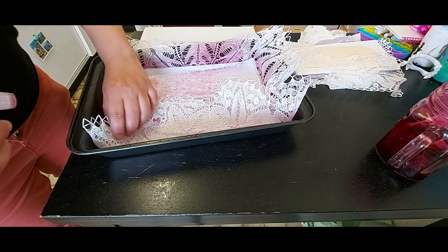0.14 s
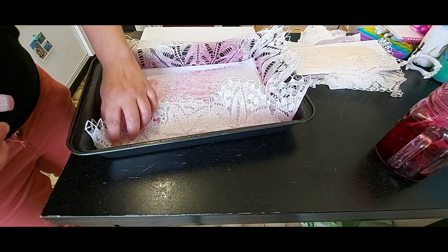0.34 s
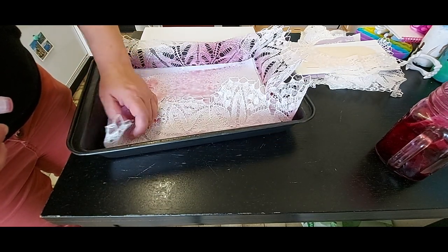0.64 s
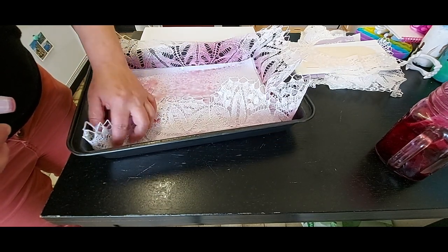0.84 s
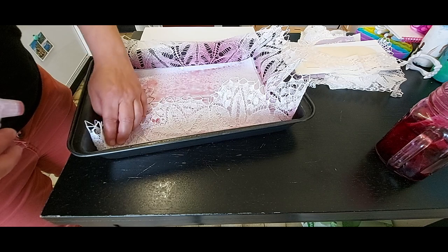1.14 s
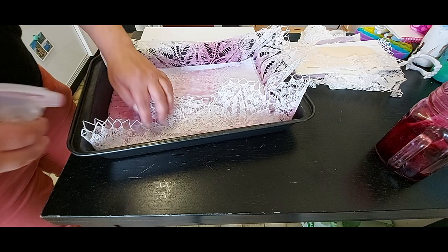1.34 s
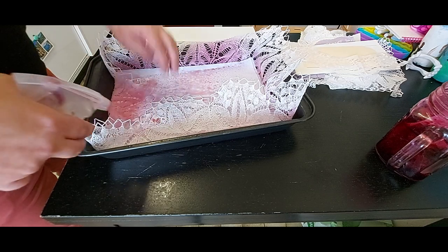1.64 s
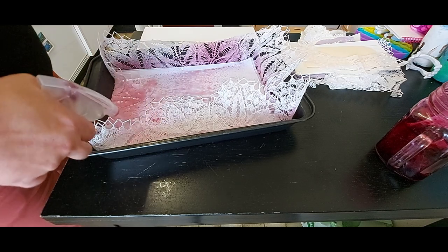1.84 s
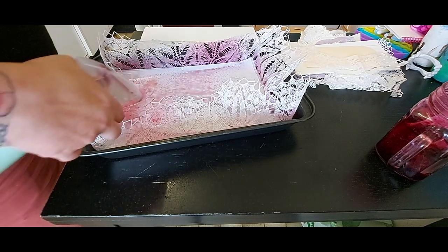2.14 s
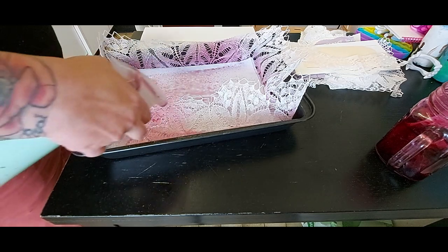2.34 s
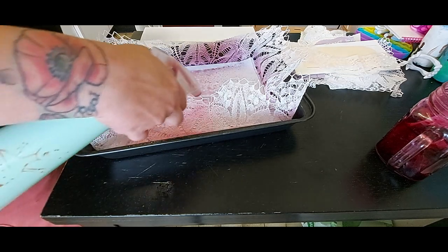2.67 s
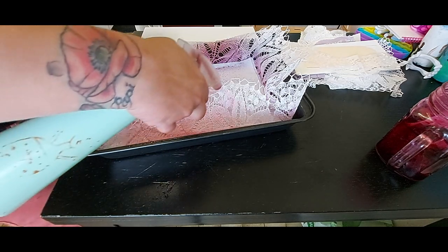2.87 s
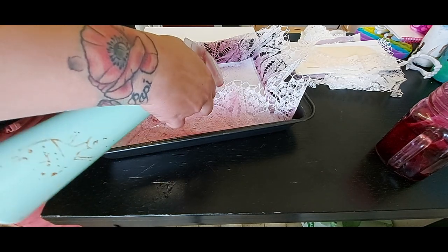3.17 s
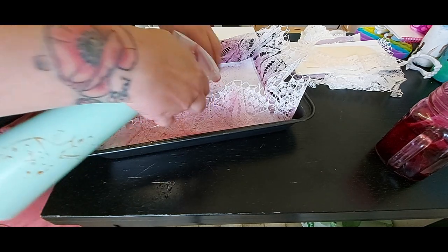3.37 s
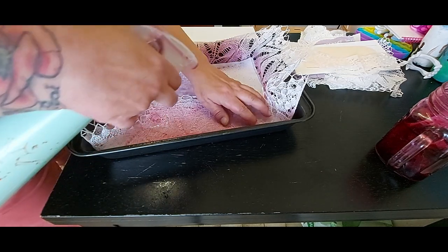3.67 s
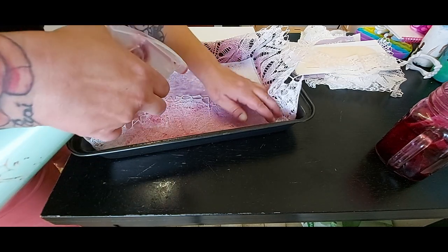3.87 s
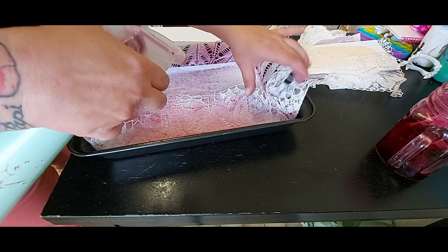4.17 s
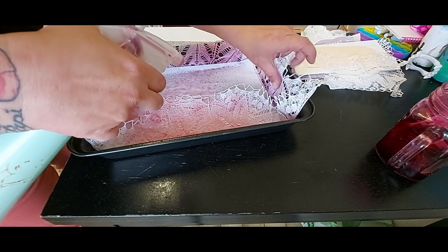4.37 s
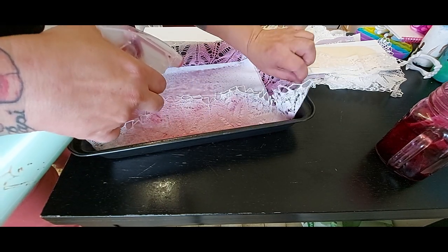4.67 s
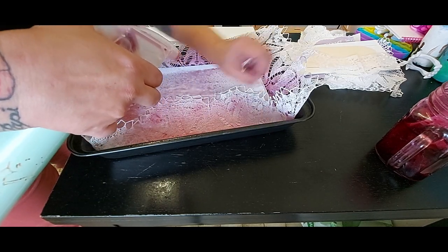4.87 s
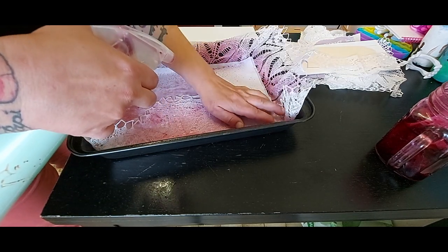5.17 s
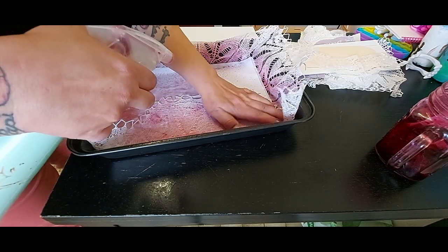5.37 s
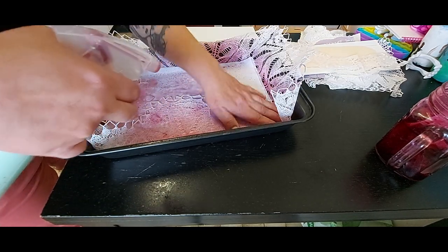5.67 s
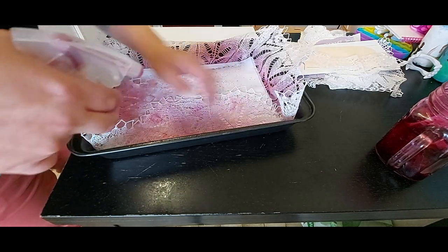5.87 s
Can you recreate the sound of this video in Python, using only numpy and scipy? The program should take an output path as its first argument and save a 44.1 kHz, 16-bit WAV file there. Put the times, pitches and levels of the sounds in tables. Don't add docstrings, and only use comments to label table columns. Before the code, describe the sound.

A close, quiet stereo scene in a small room with faint boomy air, a low motor hum and a thin flickering whine. From 0 to 1.3 s fingers brush paper softly, with a dry tick and plastic knock at 0.35 and a fainter one at 0.9. Around 1.45 plastic knocks cluster and the table thuds. At 1.75 the trigger lever clicks and the hollow bottle booms lightly; four spray bursts follow, peaking near 1.9, 2.25, 2.6 and 2.95, each swelling into bright wet hiss with droplets pattering and spitting on paper. Lever clicks punctuate them, sharpest at 2.6, with the release at 3.2. A barely audible air intake follows, with faint rustles and table bumps around 3.6. A soft, dull pat on the metal tray lands at 3.8, then near quiet. Three gentle pats come at 5.1, 5.3 and 5.5, with slight knocks and rustling to the end.

```python
import sys
import numpy as np
from scipy import signal
from scipy.fft import rfft, irfft, next_fast_len
from scipy.io import wavfile
from scipy.ndimage import uniform_filter1d, map_coordinates

SR = 44100
rng = np.random.default_rng(int(sys.argv[2]) if len(sys.argv) > 2 else 0)


def master(y):
    cut = np.clip(np.atleast_2d(y).T, -1, 1)
    pcm = np.round(cut * 32767)
    wavfile.write(sys.argv[1], SR, pcm.astype(np.int16))


def decibels_to_gain(level_db):
    exponent = np.asarray(level_db, float) / 20
    return 10 ** exponent


N = 265372
MS = np.arange(0, N / SR + 0.002, 0.001)

# hz, likeness
MIST_LIKENESS = [(60, 0.65), (240, 0.43), (950, 0.24), (3770, 0.02), (15000, 0.05)]
# hz, left_minus_right_db
MIST_LEAN = [(60, -8), (180, 9.5), (550, 1), (1650, -2), (4970, 1), (9500, -4.5), (15000, -1)]
# delay_s, level_db, left_minus_right_db
WALL_ECHOES = [(.0045, -19.5, 0), (0.012, -6, 0), (.018, -9.5, 0), (.024, -13.5, 0), (.033, -20.5, -1)]


def spray():
    # start_s, level_db
    leaks = [
        (1.735, -61),
        (1.787, -62),
        (2.114, -59),
        (2.463, -55.5),
        (2.819, -54.5),
        (3.199, -59.5),
    ]
    # hz, density_db
    nozzle = [(2060, -26), (3500, -20), (4100, -20), (5000, -7.5), (6870, -6), (9140, -2), (11000, -2),
              (12100, 0), (16000, -9)]
    # hz, density_db
    drops = [(210, -44.5), (350, -17.5), (771, -7.5), (852, -8), (1030, -5), (1110, -6), (1640, -2.5),
             (3020, -1.5), (4130, -1.5), (5120, -6), (7000, -5.5), (9100, -30.5), (15400, -120)]
    fall_s, hiss_over_drops_db = 0.11, -5
    dribbles = [(s, fall_s, db + hiss_over_drops_db, db) for s, db in leaks]
    hiss, patter = pressure() + flicks(dribbles, rise_s=0.002)
    jet = rush(nozzle, MIST_LIKENESS, patchy_db=2.0, grains=440, spread_db=2.0, side=MIST_LEAN)
    rain = rush(drops, MIST_LIKENESS, patchy_db=1.5, grains=570, spread_db=-3.5, side=MIST_LEAN)
    sputter_db = 0.33 * wobble(60)
    return decibels_to_gain(2 + sputter_db) * hiss * jet + decibels_to_gain(2.5 + sputter_db) * patter * rain


def pressure():
    # peak_s, hiss_db, drops_over_hiss_db
    strokes = [
        (1.894, -28.5, -3.5),
        (2.242, -31.5, -0.2),
        (2.593, -30, -.3),
        (2.964, -31.5, -.5),
    ]
    build_s, hold_s = 0.2, 0.016
    narrow_db = 80.5 * np.array([[1.033], [1]])
    level = 0
    for peak_s, hiss_db, drops_db in strokes:
        after_s = MS - peak_s
        after_s = after_s - np.clip(after_s, 0, hold_s)
        log_time = np.log(np.clip(1 + after_s / build_s, 1e-3, None))
        peak_db = np.array([[hiss_db], [hiss_db + drops_db]])
        level = level + decibels_to_gain(peak_db - narrow_db * log_time ** 2)
    return fine(level)


def sweeps():
    # middle_s, half_length_s, low_db, middle_db, high_db
    passes = [(1.845, 0.049, -55, -47, -50.5), (1.927, .05, -50.5, -43.5, -40),
              (1.998, 0.068, -49.5, -49, -50), (2.201, 0.047, -49.5, -40.5, -55),
              (2.269, .06, -48.5, -42, -46), (2.397, 0.072, -61, -65, -57),
              (2.541, 0.036, -50.5, -44, -41.5), (2.61, .04, -53, -44, -36), (2.637, .03, -48, -41, -46),
              (2.716, .08, -53, -62, -52.5), (2.91, 0.038, -50.5, -49, -49),
              (2.965, 0.044, -50.5, -45.5, -37.5), (3.003, .05, -47, -42, -44),
              (3.119, 0.084, -56.5, -61, -59.5)]
    # pitch_hz, width_hz
    cavities = [(780, 260), (1620, 320), (3950, 502)]
    out = np.zeros((2, N))
    for gain, (hz, w) in zip(swells(passes), cavities):
        band = [(hz / 3, -80), (hz - 1.5 * w, -26), (hz - w / 2, -3), (hz, 0),
                (hz + w / 2, -3), (hz + 3 * w, -30), (3 * hz, -90)]
        out += gain * rush(band, MIST_LIKENESS, patchy_db=2.1, side=MIST_LEAN)
    return out


def spits():
    # start_s, peak_db, left_minus_right_db
    bursts = [(0.3453, -29, -1.0), (.3495, -33, -2), (0.8856, -42, -2.5), (1.8427, -21, -1),
              (1.8754, -17.5, 1.5), (1.8924, -14.5, 1.5), (1.9084, -14.5, 1), (1.9114, -14.5, 0),
              (1.9224, -16.5, -1.5), (2.1894, -23.5, -1.0), (2.2674, -19, -3.5), (2.2954, -23, -0.5),
              (2.5424, -20.5, -1), (2.6194, -17.5, 0), (2.9113, -24, -3.0), (2.9844, -21, -3),
              (5.0529, -41, -2), (5.5194, -45, -3.5)]
    out = np.zeros((2, N))
    for s, db, pan_db in bursts:
        add(out, s, decibels_to_gain(db - 7.0) * crack(0.0018), pan_db, wet_db=-13.5, echo_db=-12.5)
    return out


def trigger():
    # start_s, click_peak_db, click_hz, boom_db, boom_hz
    contacts = [(1.7354, -40, 2280, -61, 287.4), (1.7445, -46, 2300, -70, 291),
                (1.766, -48, 4000, -72, 290), (1.7796, -51.5, 1170, -40.5, 285),
                (1.789, -39.5, 2600, -60, 285), (2.1147, -27, 4720, -46, 300),
                (2.1228, -38, 4300, -60, 295), (2.1263, -33, 4650, -44, 287.7),
                (2.1374, -37, 4500, -53, 292), (2.349, -29, 4000, -58, 315), (2.46, -44, 4300, -70, 315),
                (2.4631, -28, 4430, -47, 318), (2.4736, -31, 4500, -45.5, 324.6),
                (2.48, -36, 4600, -52, 320), (2.49, -39, 4200, -60, 320), (2.5285, -24.5, 4000, -60, 320),
                (2.5992, -10.5, 4050, -54, 327), (2.7306, -34.5, 4000, -53, 292),
                (2.8185, -27.5, 4100, -49, 307), (2.829, -31.5, 3900, -58, 303),
                (2.8361, -34, 3540, -44.5, 296), (3.07, -36.5, 2370, -51.5, 319.5),
                (3.1989, -30, 1360, -50.5, 341), (3.2114, -31, 1300, -60, 323),
                (3.2195, -33.5, 1400, -61, 320)]
    # pitch_hz, level_db, t60_s
    lever = [(2170, 3, 0.008), (3770, 9, 0.0044), (5300, 7, .005), (6600, 5, .004), (8300, 3, 0.003),
             (11000, 2.5, 0.005), (13300, -2, .003)]
    boom_t60_s = 0.13
    out = np.zeros((2, N))
    for s, db, click_hz, boom_db, hz in contacts:
        click = ring([(click_hz, 7, 0.013)] + lever, 0.00015, scatter_db=2) + 0.12 * crack(0.005)
        bottle = [(hz, 0, boom_t60_s), (hz * 1.3, -6, 0.44 * boom_t60_s), (hz * 2.094, -14, 0.06)]
        boom = ring(bottle, 0.0018, scatter_db=1.5)
        sound = decibels_to_gain(db - 5.5) * click + decibels_to_gain(boom_db + 5.0) * boom
        add(out, s, sound, 4.5, wet_db=-7, echo_db=-14)
    return out


def refill():
    # middle_s, half_length_s, level_db
    intake = [
        (3.42, .3, -70.5),
    ]
    # hz, density_db
    vent = [(2150, -30), (2330, 9.5), (2520, -20), (4800, -14), (5800, 2.5), (6600, -1.5), (7600, -5),
            (9000, -25.5)]
    return decibels_to_gain(-2.0) * swells(intake)[0] * rush(vent, MIST_LIKENESS, patchy_db=3.5)


def tray():
    # start_s, peak_db, paper_slap_db, left_minus_right_db, hardness_db_per_octave
    pats = [
        (3.802, -33, -72, -9, .5),
        (5.0844, -34, -58, -8, 0.5),
        (5.281, -35, -77, -10, 0.4),
        (5.4968, -38, -70, -8, -1.5),
    ]
    # start_s, peak_db, paper_slap_db, left_minus_right_db, hardness_db_per_octave
    bumps = [
        (1.7797, -31, -60.5, 10, .6),
        (5.539, -43, -64, -24, 10),
    ]
    # pitch_hz, level_db, t60_s
    modes = [(620, 14, .004), (340, 4, .008), (1100, 4, .003), (155.5, -14, 0.2), (320, -18, 0.09),
             (436, -19, 0.043), (524, -9, 0.11), (603, -22, 0.028), (701, -13, 0.06), (790, -20, .05),
             (855, -16, 0.039), (965, -22, .04), (1150, -26, 0.04), (1590, -34, 0.035)]
    # delay_s, level_db, left_minus_right_db
    corner = [(.0028, 5, 1), (.0053, -4, 8), (.0062, -4, -9), (.0113, 2, -1), (.0126, -3.5, 5),
              (.0148, -1, 1), (.0183, 3, 0), (.0212, -5, 0), (.0242, 1.5, -3), (.0285, -6.5, 0),
              (.033, -1.5, 2)]
    palm_hz = 190, 1350
    soft = blows(pats, modes, attack_s=0.0004, slap_t60_s=0.03, wet_db=9.5, walls=corner)
    soft = signal.sosfilt(signal.butter(2, palm_hz, "bandpass", fs=SR, output="sos"), soft)
    return soft + blows(bumps, modes, attack_s=0.00065, slap_t60_s=0.03, wet_db=1.0)


def knocks():
    # start_s, peak_db, slap_db, left_minus_right_db, hardness_db_per_octave
    hits = [(0.347, -37.5, -51, -11.5, -4), (0.389, -49, -55, -13.5, -2), (0.509, -57, -67, 1, 3),
            (0.885, -78, -66, -27, -0.7), (1.448, -52, -56, -8.5, -5), (1.459, -38, -46, -3, 3.5),
            (1.469, -42.5, -54.5, -3, 3.5), (1.499, -49.5, -53.5, -9.5, -12), (3.578, -63, -67, -8.5, 0),
            (5.209, -72, -58.5, -4.5, -0.7), (5.577, -53, -70, -18, -1.5)]
    # pitch_hz, level_db, t60_s
    shell = [(285, -16, 0.18), (438, -7, 0.076), (504.5, -16.5, 0.097), (700, -3, .07), (920, 1, 0.045),
             (1064, 4.5, 0.045), (1274, 1, 0.053), (1855, 3.5, 0.023), (2248, 4.5, 0.022), (2680, -9, .03),
             (2970, -6, 0.04), (3620, -15, 0.027), (4500, -5, 0.019)]
    return blows(hits, shell, attack_s=0.00035, slap_t60_s=0.025, wet_db=-1.5)


def thuds():
    # start_s, peak_db, deep_db
    pushes = [(0.26, -52.5, -75), (0.31, -62, -72), (1.448, -50, -44), (1.468, -43.5, -45),
              (1.497, -48, -49), (1.51, -50.5, -54), (2.88, -41.5, -69), (2.948, -45, -54.5),
              (3.597, -54.5, -74.5), (3.616, -52, -74), (3.641, -51.5, -73), (3.66, -53.5, -74),
              (3.7, -57, -75), (4.737, -53.5, -77), (4.756, -51, -77), (4.779, -51.5, -71),
              (4.798, -56, -76), (4.845, -57.5, -77), (5.158, -56, -49), (5.199, -61, -52),
              (5.56, -46.5, -59), (5.62, -58, -62)]
    # pitch_hz, level_db, t60_s
    table_top = [(118, -0.5, 0.23), (145, 0, .15), (235.7, 5, 0.12), (295, 5, 0.12), (361, 4.5, .1),
                 (429, -1.5, .1)]
    legs = [(53.9, -1.5, 0.25), (79.8, 2, 0.18), (149.3, -4.5, 0.19)]
    out = np.zeros((2, N))
    for s, db, deep_db in pushes:
        deep = 0.79 * decibels_to_gain(deep_db) * ring(legs, 0.008, scatter_db=2.0)
        top = decibels_to_gain(db) * ring(table_top, 0.0039, scatter_db=1)
        add(out, s, top + deep, -1.5, wet_db=-6.5, echo_db=-0.5)
    return out


def paper():
    # start_s, fall_20db_s, thin_db, coarse_db
    flicked = [(.3455, 0.07, -45.5, -42), (.495, .15, -66, -65), (.885, 0.1, -62, -73),
               (1.444, .05, -66, -58), (1.455, 0.12, -62, -49), (3.8, 0.14, -72, -67),
               (4.021, 0.08, -65.5, -86.5), (4.55, 0.1, -75, -82), (5.05, 0.16, -71, -62.5),
               (5.083, 0.24, -65.5, -61), (5.198, 0.09, -58.5, -61.5), (5.535, 0.1, -76, -59.5),
               (5.65, 0.15, -70.5, -72), (5.73, 0.3, -64, -78)]
    # middle_s, half_length_s, thin_db, coarse_db
    slides = [(.09, 0.12, -69.5, -64), (.2, 0.12, -67.5, -67), (.67, .07, -72, -75),
              (.935, 0.089, -73, -65), (1.12, .12, -79, -79), (1.28, 0.076, -72.5, -75.5),
              (3.34, 0.21, -79, -68.5), (3.76, 0.079, -75, -72), (3.64, 0.086, -63.5, -66.5),
              (3.59, 0.033, -74.5, -69), (3.82, .06, -71, -75), (5.14, 0.17, -70.5, -78),
              (.36, 0.11, -66, -73), (3.93, 0.092, -78, -82), (4.33, .12, -76, -82),
              (5.43, 0.07, -82, -78.5)]
    rest_db = -89, -83
    # hz, density_db
    thin_spectrum = [(2350, -40), (4000, -3.5), (4870, -1.5), (5700, 0), (7880, -1.5), (12200, 0),
                     (16000, -9)]
    # hz, density_db
    coarse_spectrum = [(350, -42), (600, 1), (770, 4), (1150, -2.5), (1350, 1), (1680, -6), (2710, -1.5),
                       (8000, -13), (10400, -34), (17600, -120)]
    rest = decibels_to_gain(np.array(rest_db)[:, None] + 1.5 * wobble(7))
    thin, coarse = np.sqrt(flicks(flicked, rise_s=0.0039) ** 2 + swells(slides) ** 2 + rest ** 2)
    crisp = rush(thin_spectrum, MIST_LIKENESS, patchy_db=3.0)
    rough = rush(coarse_spectrum, MIST_LIKENESS, patchy_db=1.0)
    return decibels_to_gain(2.5 + 0.67 * wobble(130)) * thin * crisp + decibels_to_gain(4.0 + 1.2 * wobble(65)) * coarse * rough


def house():
    # hz, density_db
    air_spectrum = [(15, -41), (25, -14.5), (64, 1), (200, -6.5), (439, -5.5), (1190, -17.5), (1370, -11),
                    (1520, -19), (2550, -21), (2840, -27.5), (3430, -37), (6210, -35), (11000, -18),
                    (14400, -26), (16000, -37)]
    # hz, likeness
    likeness = [(60, 0.92), (180, 0.576), (550, 0.38), (1650, -0.36), (4970, -0.99), (15000, -0.01)]
    # middle_s, half_length_s, level_db
    stirs = [
        (2.0, 0.21, -60),
        (2.95, 0.19, -53.5),
        (3.3, 0.19, -63.5),
    ]
    air_db, murk_db, drone_db, drone_hz = -65, -66.5, -70.5, 54.7
    murk = decibels_to_gain(murk_db + 1.5 * wobble(2.03)) + swells(stirs)[0]
    drone = decibels_to_gain(drone_db + 3 * wobble(2.993))
    air = decibels_to_gain(air_db - 1.5) * rush(air_spectrum, likeness, patchy_db=0.1)
    boomy = [(150, -42.0), (230, -6.0), (300, -2.0), (460, 1.5), (600, -16.0), (1500, -34.0)]
    far = rush(boomy, likeness, patchy_db=0.5)
    hum_band = [(drone_hz * 0.6, -40), (drone_hz * 0.893, -3), (drone_hz * 0.93, 0),
                (drone_hz * 0.53, -14), (drone_hz * 2.2, -40)]
    motor = rush(hum_band, likeness, patchy_db=1.0)
    return decibels_to_gain([[-0.8], [0.8]]) * (air + 0.78 * murk * far + 1.15 * drone * motor)


def whine():
    # middle_s, half_length_s, level_db
    spells = [(.47, .06, -75), (.65, .08, -88), (.82, .1, -84), (1.1, .06, -92), (1.29, .09, -80),
              (1.6, .08, -84), (3.4, .09, -79), (3.63, .1, -78), (3.96, 0.16, -82), (4.17, 0.1, -82.5),
              (4.35, .06, -90), (4.58, .05, -86.5), (4.68, .04, -87), (4.8, .12, -86.5), (5.2, .15, -85),
              (5.63, .08, -85)]
    whine_hz, floor_db, buzz_hz, buzz_db = 2810, -91.5, 1400, -88
    t = np.arange(N) / SR
    tone = np.sin(2 * np.pi * whine_hz * t + 1.2 * wobble(40))
    flicker = decibels_to_gain(1.3 * wobble(14) + 2.9 * wobble(30))
    buzz = decibels_to_gain(buzz_db + 2.2 * wobble(9)) * np.sin(2 * np.pi * buzz_hz * t + 1.6 * wobble(50))
    return buzz + flicker * (decibels_to_gain(floor_db) + swells(spells)[0]) * tone


def blows(events, modes, attack_s, slap_t60_s, wet_db, walls=WALL_ECHOES):
    out = np.zeros((2, N))
    for s, db, slap_db, pan_db, hard_db in events:
        tilted = [(hz, level + hard_db * np.log2(hz / 600), t60) for hz, level, t60 in modes]
        body = -decibels_to_gain(db) * ring(tilted, attack_s, scatter_db=1.5)
        slap = decibels_to_gain(slap_db - 9) * crack(slap_t60_s)
        add(out, s, body + slap, pan_db, wet_db, walls=walls)
    return out


def ring(modes, attack_s, scatter_db):
    t = np.arange(SR // 3) / SR
    hz, db, t60 = np.transpose(modes)[:, :, None]
    db = db + scatter_db * rng.standard_normal(db.shape)
    x = (decibels_to_gain(db - 60 * t / t60) * np.sin(2 * np.pi * hz * t)).sum(0)
    x = x * (1 - np.exp(-t / attack_s)) ** 2
    return x / abs(x).max()


def crack(t60_s):
    t = np.arange(SR // 3) / SR
    return np.diff(rng.standard_normal(len(t) + 1)) * decibels_to_gain(-60 * t / t60_s)


def add(out, s, sound, pan_db, wet_db, echo_db=0, walls=WALL_ECHOES):
    # hz, t60_s
    decay = [(100, 0.33), (500, 0.38), (2000, 0.35), (10000, 0.13)]
    # hz, likeness
    likeness = [(60, 0.39), (300, 0.84), (800, 0.3), (2000, .1), (8000, 0.016)]
    noise = rng.standard_normal((2, SR // 2))[:, :SR // 3]
    hz, t, z = signal.stft(noise, SR, nperseg=256)
    turn = np.arccos(np.clip(along(likeness, hz), -1, 1))[:, None] / 2
    mid, dif = z[0] * np.cos(turn), z[1] * np.sin(turn)
    fade = decibels_to_gain(-60 * t / along(decay, hz)[:, None])
    tail = signal.istft(np.array([mid + dif, mid - dif]) * fade, SR, nperseg=256)[1]
    tail = decibels_to_gain(wet_db) * tail / np.linalg.norm(tail[0])
    tail = np.pad(tail, ((0, 0), (SR // 200, 0)))
    tail[:, 0] = decibels_to_gain([pan_db / 2, -pan_db / 2])
    for delay_s, db, lean_db in walls:
        port_db = db + echo_db + np.array([lean_db, -lean_db]) / 2
        tail[:, round(delay_s * SR)] += decibels_to_gain(port_db + 1.1 * rng.standard_normal(2))
    heard = signal.fftconvolve(sound[None], tail, axes=1)
    part = out[:, round(s * SR):][:, :heard.shape[1]]
    part += heard[:, :part.shape[1]]


def rush(spectrum, alike, patchy_db, grains=0, spread_db=0, side=((100, 0), (9000, 0))):
    x = rng.standard_normal((2, N))
    hit = rng.random(N) < grains / SR
    x = x * (1 + hit * decibels_to_gain(spread_db * np.minimum(rng.exponential(size=N), 2.8)))
    z = signal.stft(x, nperseg=256)[2]
    field = uniform_filter1d(rng.standard_normal(z.shape[1:]), size=4, axis=0)
    field = uniform_filter1d(field, size=8, axis=1)
    x = signal.istft(z * decibels_to_gain(patchy_db * unit(field)), nperseg=256)[1][:, :N]
    m = next_fast_len(N)
    hz = np.fft.rfftfreq(m, 1 / SR)
    turn = np.arccos(np.clip(along(alike, hz), -1, 1)) / 2
    mid, dif = rfft(x, m) * decibels_to_gain(along(spectrum, hz)) * [np.cos(turn), np.sin(turn)]
    lean = decibels_to_gain(along(side, hz) / 2)
    return unit(irfft([(mid + dif) * lean, (mid - dif) / lean], m)[:, :N])


def flicks(rows, rise_s):
    power = 0
    for s, fall_s, *db in rows:
        fall = decibels_to_gain(np.array(db)[:, None] - 20 * abs(MS - s) / fall_s)
        power = power + (fall * np.clip((MS - s) / rise_s, 0, 1)) ** 2
    return fine(np.sqrt(power))


def swells(rows):
    power = 0
    for s, half_s, *db in rows:
        power = power + decibels_to_gain(np.array(db)[:, None] - 20 * ((MS - s) / half_s) ** 2) ** 2
    return fine(np.sqrt(power))


def fine(gain):
    return np.array([np.interp(np.arange(N) / SR, MS, g) for g in gain])


def wobble(rate_hz):
    knots = rng.standard_normal(int(N * rate_hz / SR) + 4)
    return map_coordinates(knots, [np.arange(N) * rate_hz / SR])


def along(points, hz):
    f, v = np.transpose(points)
    return np.interp(np.log(hz + 1), np.log(f + 1), v)


def unit(x):
    return x / np.sqrt(np.mean(x ** 2) + 1e-20)


def scene():
    bottle = spray() + sweeps() + spits() + trigger() + refill()
    handling = tray() + knocks() + thuds() + paper()
    return bottle + handling + house() + whine()


def low_pass(x):
    return signal.sosfilt(signal.butter(12, 16490, fs=SR, output="sos"), x)


def record(dry):
    mic_hz, top_hz = 44.45, 15900
    dry = signal.sosfilt(signal.butter(2, mic_hz, "highpass", fs=SR, output="sos"), dry)
    m = next_fast_len(N)
    dry = irfft(rfft(dry, m) * (np.fft.rfftfreq(m, 1 / SR) < top_hz), m)[:, :N]
    return low_pass(dry)


dry = scene()
out = record(dry)
master(out)
```